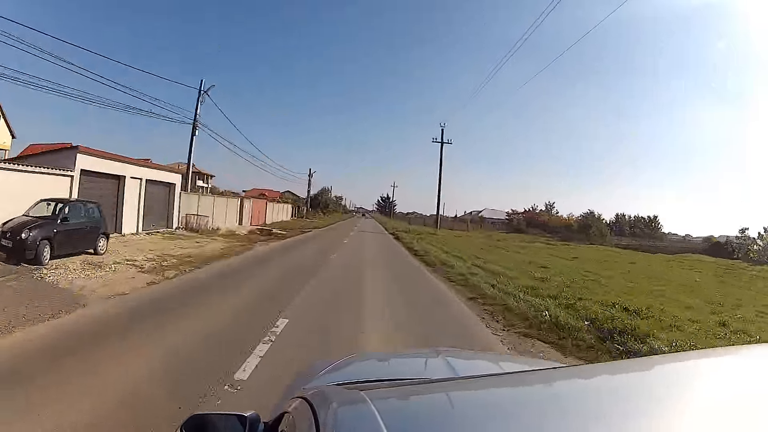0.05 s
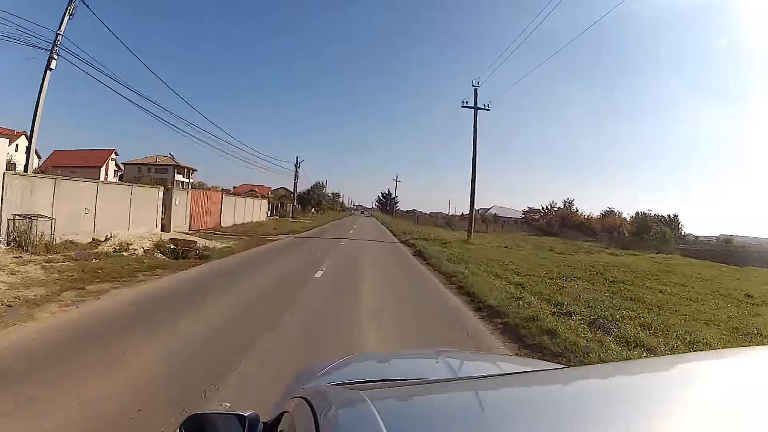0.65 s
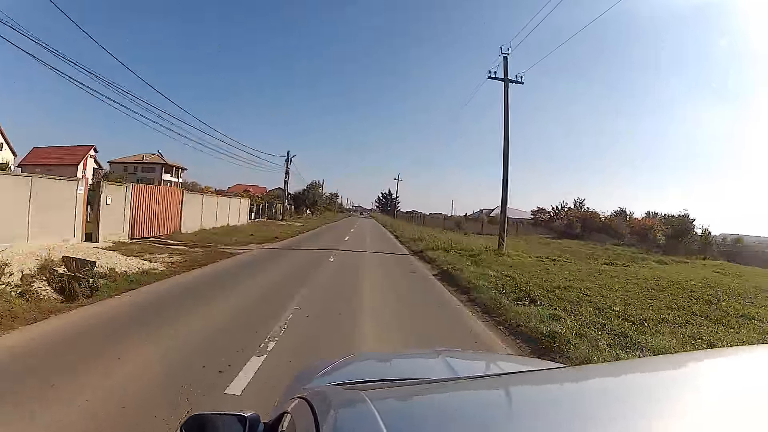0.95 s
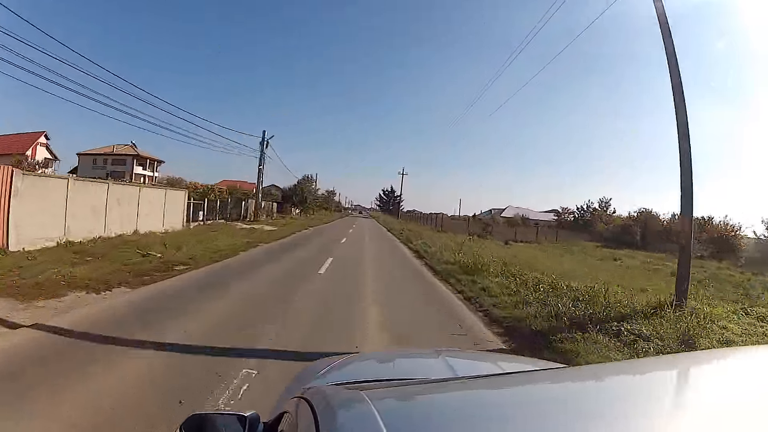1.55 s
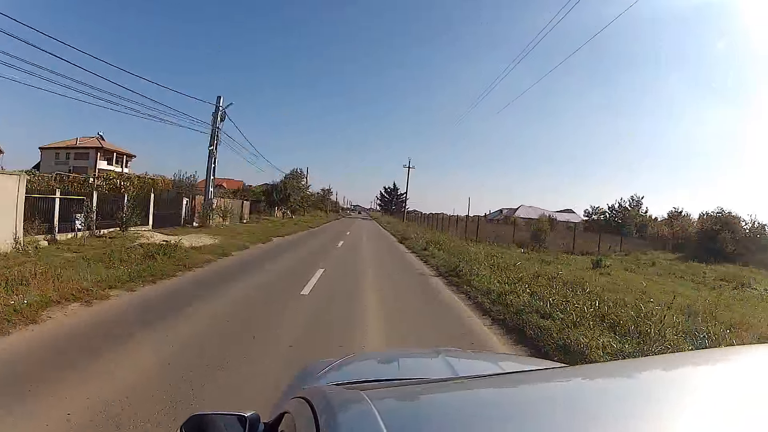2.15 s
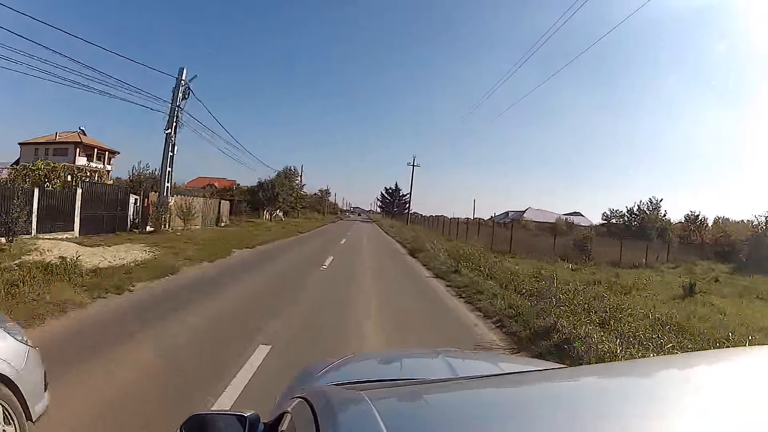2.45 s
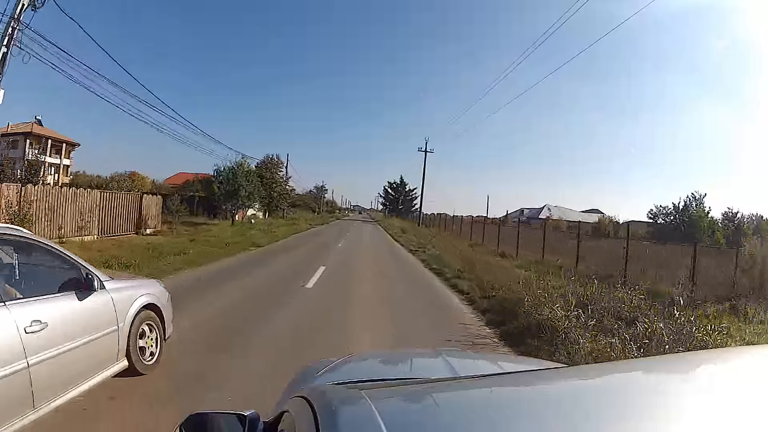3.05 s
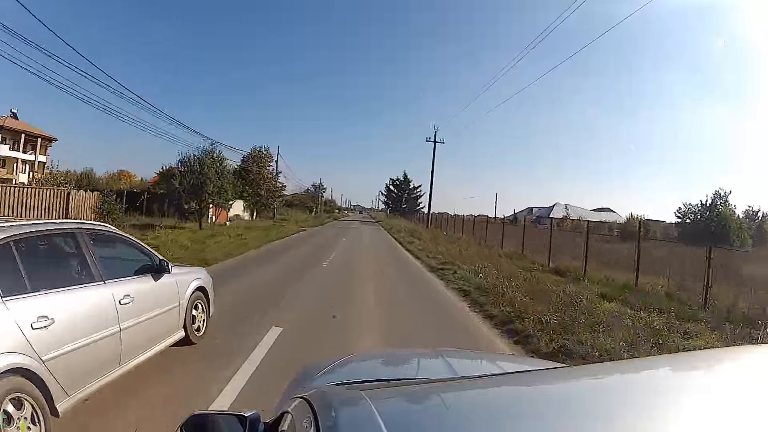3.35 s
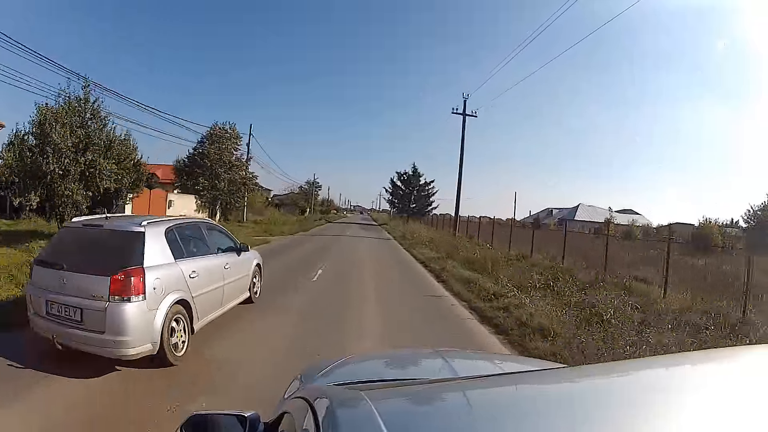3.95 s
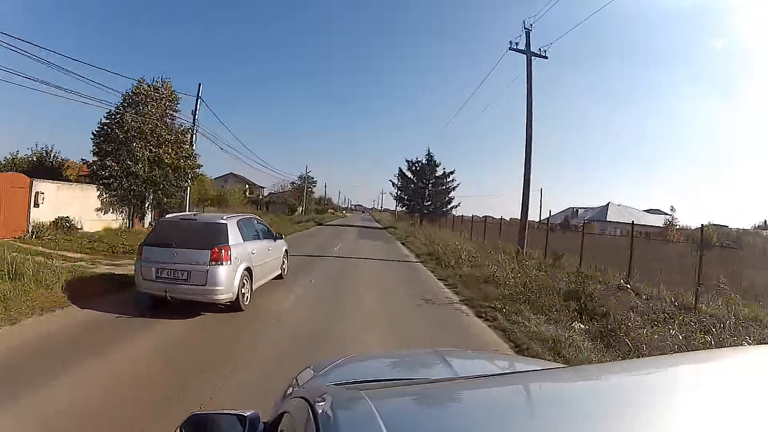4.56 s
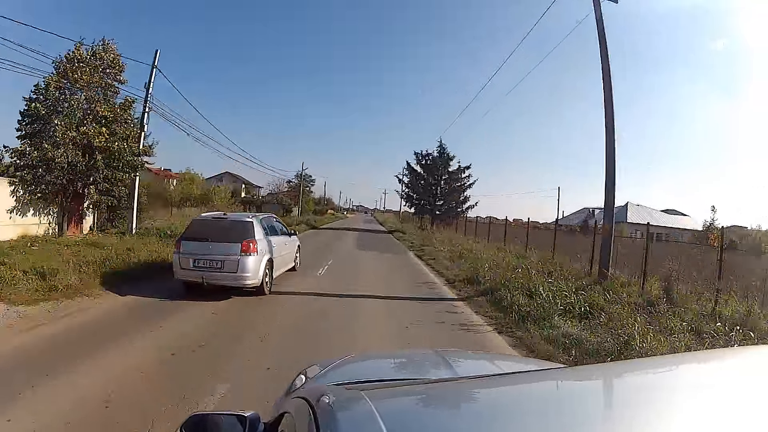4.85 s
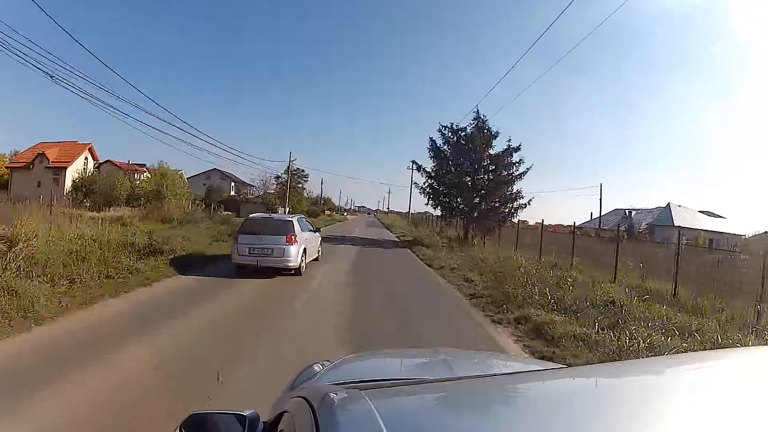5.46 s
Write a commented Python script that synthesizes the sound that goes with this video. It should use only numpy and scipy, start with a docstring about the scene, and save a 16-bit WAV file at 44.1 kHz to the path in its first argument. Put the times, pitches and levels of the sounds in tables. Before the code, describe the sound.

A car cruises along an asphalt road, heard from a microphone mounted on its outside. Deep wind rumble buffets the microphone throughout, with irregular soft thumps and fluttering. The diesel engine holds a steady low drone with light ticking, and the tyres roar evenly under a faint hiss of air. Midway, another car overtakes on the left, barely audible.

```python
"""Wind buffets over the steady drone of a four-cylinder diesel, heard from a camera on the outside of a
cruising car. Every firing knocks the block, injectors and valves tick, and the tyres roar on the asphalt.
Eddies flutter and thump against the camera while passing air hisses and rushes along the bodywork.
Midway, another car overtakes on the left, barely heard above it all."""
import sys
import numpy as np
from scipy import signal
from scipy.fft import rfft, irfft, next_fast_len
from scipy.io import wavfile
from scipy.ndimage import uniform_filter1d, map_coordinates

SR = 44100
rng = np.random.default_rng(int(sys.argv[2]) if len(sys.argv) > 2 else 0)


def persist_wave(psi):
    """Save psi, clipped to +-1, as 16-bit WAV."""
    counts = np.round(np.clip(psi, -1, 1) * 32767).astype(np.int16)
    wavfile.write(sys.argv[1], SR, np.atleast_2d(counts).T)


N = 251370

# engine speed: time_s, firing_rate_hz
FIRING_RATE = [(0.0, 64.64), (1.7, 64.71), (3.0, 64.55), (4.6, 64.69), (5.7, 64.61)]
# the four cylinders: injection_moment_cycles, strength_db
CYLINDERS = [(0.109, -1.5), (0.369, 4), (0.612, 2.5), (0.866, 2)]
# drone of block, intake and exhaust: multiple_of_cycle_rate, level_db, left_over_right_db
DRONE_ORDERS = [(2, -34.2, 1), (3, -40.6, -1), (4, -19.9, 4), (8, -46.3, 0), (11, -40.6, -1),
                (12, -41.9, -9), (13, -43.3, -1), (14, -47.2, 1), (15, -47.9, 0), (20, -45.3, 4),
                (21, -48.8, 2), (23, -48.6, -1), (25, -50.4, 1), (26, -43.2, 0), (27, -50.5, 1),
                (28, -50.7, 1), (30, -44.8, 3), (31, -50.1, 1), (32, -43.8, 0), (35, -46.9, 3),
                (36, -40.0, -1), (40, -44.9, -2), (41, -47.2, 1), (42, -46.7, 2), (43, -47.0, 1),
                (44, -45.0, -3), (45, -49.3, 1), (48, -49.4, 2), (52, -48.5, 3), (60, -47.6, 6),
                (61, -52.3, 4), (64, -48.2, 2), (66, -50.0, 4), (72, -49.7, 3), (76, -52.3, 4),
                (81, -58, 3), (83, -57, 3), (86, -53.6, 3), (88, -51.5, 1), (90, -58.5, 3), (98, -59, 4),
                (108, -54.5, 5), (136, -55.3, 3), (144, -60.5, 4), (156, -61.5, 4), (179, -61.5, 4),
                (182, -66, 4), (220, -66, 3), (224, -65, 3), (248, -70, 3)]
# faint whine of belt-driven parts: pitch_hz, level_db, left_over_right_db
BELT_TONES = [(804, -50, 1), (995, -52.5, 19)]
# narrow resonances that colour the engine's clatter: centre_hz, width_hz, lift_db
CLATTER_RESONANCES = [(1410, 42, 8), (1750, 56, 4.5), (2140, 67, 4.5), (2630, 79, 6.5), (2903, 80, 16.5),
                      (3635, 120, 12.5), (4300, 110, 2.5), (4980, 67, 14), (5260, 130, 14),
                      (6080, 76, 14.5), (6500, 110, 8), (6720, 140, 12), (8280, 190, 6.5)]

# tone colour of each layer: frequency_hz, gain_db
KNOCK_EQ = [(120, -36), (200, -31), (280, 4.5), (450, 0.5), (750, 7), (900, 4), (1100, -22), (1500, -14.5),
            (2200, -4), (3000, -11.5), (4500, -25.5)]
CLATTER_EQ = [(500, -26), (1000, 4), (1500, -0.5), (2200, -4), (2700, -10), (3200, -18), (4200, -9.5),
              (4600, -22.5), (7200, -24.5), (8300, -21), (12000, -25), (16000, -44)]
INJECTION_EQ = [(1500, -32), (3000, 8.5), (5000, -8), (7200, -4.5), (8300, 2.5), (10500, 0), (12100, 2),
                (13000, 2), (14500, -5), (16000, -20)]
TYRE_EQ = [(60, 7.5), (130, 1.5), (200, 1.5), (330, 0.7), (600, 0.5), (780, -0.5), (900, -4), (1050, 0.3),
           (1400, -7.5), (2000, -13.5), (3000, -27.5), (4500, -26.5), (8000, -39.5)]
BUFFET_EQ = [(4, -51), (10, 2), (18, -2.5), (33, 3), (52, 0.8), (66, -11), (85, -9), (105, -21), (150, -31),
             (300, -48), (800, -81)]
HISS_EQ = [(1500, -35), (3500, 4.5), (5200, 4), (6500, -1), (7200, -1.5), (8200, 1.5), (10500, 3),
           (12100, -4), (13000, -1), (14500, -8), (16000, -14)]
FLUTTER_EQ = [(45, -22), (65, 0.5), (78, 1.5), (98, -5.5), (120, -3.5), (165, -10), (230, -19.5),
              (320, -19.5), (500, -47.5)]
RUSH_EQ = [(700, -27), (1100, 1), (1400, 1.5), (1700, -1.5), (2100, -6.5), (3000, -14), (5000, -28)]
OVERTAKER_EQ = [(80, 0), (220, 0.5), (400, 2.5), (700, 0.5), (1100, -2), (1600, -8), (2500, -23),
                (5000, -40)]
# a comb of peaks and dips in the treble, from sound reflected off the bodywork: frequency_hz, gain_db
BODYWORK_RIPPLE_EQ = [(6000, 0), (6850, 0.7), (7250, -2.5), (7950, 1), (8300, -0.5), (9100, -1.6), (9750, -0.5),
                      (10650, -2), (11100, -0.7), (11700, -1), (12200, -3), (12900, -1.5), (13800, -1.5),
                      (14300, -5.5)]
# stereo width: frequency_hz, left_right_correlation
STEREO_LIKENESS = [(30, 0.94), (55, 0.99), (100, 0.65), (200, 1), (350, 0.32), (600, 1), (1000, 0.64),
                   (2000, 0.63), (3500, 0.45), (6000, 0.52), (8500, 0.45), (11000, -0.0076), (14000, -0.22)]
# stereo lean: frequency_hz, left_over_right_db
STEREO_BALANCE = [(30, -2.5), (100, -1), (200, 5), (300, 3), (600, 2), (1100, 5), (2500, 5), (4500, 2.5),
                  (14000, 2.5)]

# fader rides for asphalt coarseness, headwind, spells of flutter and rushing air: time_s, gain_db
COARSE_ASPHALT = [(0.0, 1.5), (0.27, 1.5), (0.75, 0.1), (1.03, 3), (1.35, 0.5), (1.9, 0.5), (2.08, -0.5),
                  (2.4, -0.5), (2.65, -3), (2.9, 0.5), (3.6, 1.2), (4.1, -0.5), (4.95, -1.5), (5.23, 2),
                  (5.5, -0.8), (5.7, 0)]
HEADWIND = [(0.0, 0.8), (0.25, 0), (0.6, -0.5), (0.8, -3.5), (1.05, -0.3), (1.65, -0.5), (2.0, -0.5),
            (2.25, -3.5), (2.6, -1), (3.0, 0), (3.6, -2.2), (4.05, 1), (4.6, -1), (5.05, -0.1), (5.7, -1.5)]
FLUTTER_SPELLS = [(0.0, -1), (0.3, 2.5), (0.58, 3), (0.85, 1), (1.1, -4.5), (1.5, -0.5), (2.02, 0),
                  (2.35, 2.5), (2.65, -1), (3.1, 1.5), (3.5, 1), (4.0, -6), (4.45, -0.5), (4.9, -4),
                  (5.2, -0.5), (5.7, 1.5)]
RUSH_SWELLS = [(0.0, -4), (0.35, 2), (0.8, -2), (1.2, 2), (1.6, -1), (2.05, -4), (2.35, 3), (2.7, -1),
               (3.1, -2), (3.45, -5), (3.8, -1), (4.25, -2), (4.7, 3), (5.2, -3), (5.7, -5)]
# big eddies that hit the camera: centre_s, relative_peak_db, pitch_hz
BIG_EDDIES = [(0.139, -5.5, 44), (0.23, -3.5, 28.8), (0.344, -8, 46), (0.477, -5, 40), (0.646, -6.5, 40),
              (1.033, -6, 35), (1.182, -9, 29), (1.915, -5, 35.6), (2.402, -8, 42), (2.813, -7, 48),
              (3.044, -8, 42), (3.369, -9.5, 26.9), (3.528, -4.5, 33), (3.944, -6.5, 34.6),
              (4.295, -12, 38), (4.47, -5, 45.3), (4.717, -5, 43), (4.918, -5, 38.5), (5.151, -6.5, 42.4),
              (5.233, -7.5, 36)]

TIME_S = np.arange(N) / SR


def amp(db):
    """Decibels to gain."""
    return 10 ** (np.asarray(db) / 20)


def unit(x):
    """x at rms 1."""
    return x / np.sqrt(np.mean(x ** 2) + 1e-20)


def curve(rows):
    """(time_s, value) rows as one value per sample."""
    return np.interp(TIME_S, *np.transpose(rows))


def along(points, hz):
    """(frequency_hz, value) points read on a log axis."""
    points_hz, values = np.transpose(points)
    return np.interp(np.log(hz + 1), np.log(points_hz + 1), values)


def wobble(rate_hz):
    """A smooth random curve through rate_hz knots a second."""
    return map_coordinates(rng.standard_normal(2048), [TIME_S * rate_hz], mode="mirror")


def noise():
    """Two unrelated white noises."""
    return rng.standard_normal((2, N))


def filtered(x, response):
    """x through an EQ given as a function of frequency."""
    size = next_fast_len(N + SR // 2)
    return irfft(rfft(x, size) * response(np.fft.rfftfreq(size, 1 / SR)), size)[..., :N]


def panned(left_db):
    """Left and right gains of mean power 1."""
    gains = amp([left_db / 2, -left_db / 2])
    return gains / np.sqrt(np.mean(gains ** 2, axis=0))


def coloured(pair, eq):
    """Two unrelated signals become one stereo sound of rms 1: near mono in the bass, wide on top."""
    def mid_side_gains(hz):
        width = np.arccos(np.clip(along(STEREO_LIKENESS, hz), -1, 1)) / 2
        return amp(along(eq, hz)) * [np.cos(width), np.sin(width)]

    mid, side = filtered(pair, mid_side_gains)
    stereo = np.array([mid + side, mid - side])
    return unit(filtered(stereo, lambda hz: panned(along(STEREO_BALANCE, hz))))


def every_cycle(pattern, cycle):
    """Loops a pattern once per engine cycle."""
    return map_coordinates(pattern, [cycle % 1 * len(pattern)], mode="grid-wrap")


def burst(since, rise, fall):
    """A rounded attack and a decay, once per cycle; all times are in cycles."""
    age = since % 1
    return (1 - np.exp(-age / rise)) ** 2 * np.exp(-age / fall)


def firings(cycle, rise, fall, scatter_db):
    """An envelope of one burst for each cylinder in turn, no two equally strong."""
    envelope = np.zeros(N)
    for moment, db in CYLINDERS:
        since = cycle - moment + 1
        scatter = rng.standard_normal(128)[since.astype(int)]
        envelope += amp(db + scatter_db * scatter) * burst(since, rise, fall)
    return unit(envelope)


def drone(cycle, waver_db, skew_rad, hum_hz=420, hum_width_hz=25, hum_rise_db_per_s=1.3):
    """Block, intake and exhaust hold clean orders: the firing rate booms, a mid hum slowly grows."""
    total = np.zeros((2, N))
    cycle_hz = cycle[-1] * SR / N
    rise_db = hum_rise_db_per_s * (TIME_S - N / SR / 2)
    for order, db, left_db in DRONE_ORDERS:
        # paths round the bodywork put the two sides a little out of step
        offset = skew_rad * rng.choice([-1, 1]) * np.array([[.5], [-.5]])
        tone = np.sqrt(2) * np.sin(2 * np.pi * (order * cycle + rng.random()) + offset)
        in_hum = np.exp(-((order * cycle_hz - hum_hz) / hum_width_hz) ** 2)
        total += panned(left_db)[:, None] * amp(db + in_hum * rise_db + waver_db * wobble(6)) * tone
    return total


def belt_whine(cycle, waver_db):
    """Belt-driven parts follow the shaft, but sing between its orders."""
    total = np.zeros((2, N))
    shaft_s = cycle / cycle[-1] * N / SR
    for hz, db, left_db in BELT_TONES:
        tone = np.sqrt(2) * np.sin(2 * np.pi * hz * shaft_s)
        total += panned(left_db)[:, None] * amp(db - waver_db * wobble(5.14)) * tone
    return total


def metal_ring(cycle, firing_lift_db, size=2730):
    """The metal rings alike in each cycle, on the many orders that the drone leaves free."""
    partials = np.exp(2j * np.pi * rng.random((2, size // 2 + 1)))
    # the cylinders ring much alike, which lifts the multiples of the firing rate
    partials[:, ::len(CYLINDERS)] *= amp(firing_lift_db)
    partials[:, [int(row[0]) for row in DRONE_ORDERS]] = 0
    return unit(np.array([every_cycle(ring, cycle) for ring in irfft(partials, size)]))


def knock(cycle):
    """Each combustion rings the block, which still sounds when the next one comes."""
    ring = metal_ring(cycle, firing_lift_db=5.0)
    return coloured(ring * firings(cycle, rise=0.018, fall=0.23, scatter_db=1.0), KNOCK_EQ)


def clatter(cycle, spread_cycles, fade_db, uneven_db, looseness, sustain, taps=6, size=2730):
    """Injectors and valves tap at set shaft angles after each firing; play in the parts varies the taps."""
    angle = np.arange(size) / size
    power = np.zeros(size)
    for moment, db in CYLINDERS:
        train = np.zeros(size)
        for tap, (slip, softness) in enumerate(rng.random((taps, 2))):
            delay = spread_cycles * (tap + slip / 2) / taps
            gain = amp(-fade_db * tap / taps - uneven_db * softness)
            train += (gain * burst(angle - moment - delay, rise=0.0066, fall=0.012)) ** 2
        # the taps differ less from cylinder to cylinder than the combustion does
        power += amp(db / 2) * train / train.mean()
    # sustain: the engine bay keeps ringing between the taps
    envelope = every_cycle(np.sqrt(power / power.mean() + sustain), cycle)
    ring = metal_ring(cycle, firing_lift_db=1.0) + looseness * noise()
    rattle = ring * envelope * amp(1.05 * wobble(130))
    return coloured(filtered(rattle, clatter_resonances), CLATTER_EQ)


def clatter_resonances(hz):
    """Narrow peaks colour the clatter: ringing engine metal lower down, the camera's case in the treble."""
    return 1 + sum((amp(db) - 1) / (1 + 2j * (hz - centre) / width)
                   for centre, width, db in CLATTER_RESONANCES)


def injection(cycle):
    """A short bright tick of fuel at each firing."""
    return coloured(noise() * firings(cycle, rise=0.036, fall=0.055, scatter_db=1.5), INJECTION_EQ)


def engine(drift_cycles):
    """All engine layers follow one shaft that drifts ahead and behind; four firings make a cycle."""
    cycle = np.cumsum(curve(FIRING_RATE)) / SR / len(CYLINDERS) + drift_cycles * wobble(5)
    return (amp(0.08) * drone(cycle, waver_db=0.66, skew_rad=0.5)
            + belt_whine(cycle, waver_db=2.5)
            + amp(-41.0) * knock(cycle)
            + amp(-43.5) * clatter(cycle, spread_cycles=0.218, fade_db=21.5, uneven_db=10.5,
                                   looseness=0.36, sustain=0.42)
            + amp(-51.0) * injection(cycle))


def tyres(patchy_db, low_share, tread_hz=794):
    """Tread roars on asphalt, its colour shifting with the surface; coarse stretches lift the top most."""
    spectrogram = signal.stft(noise(), nperseg=1024)[2]
    patches = rng.standard_normal(spectrogram.shape[1:])
    patches = uniform_filter1d(patches, size=7, axis=0)  # smooth across frequency
    patches = uniform_filter1d(patches, size=14, axis=1)  # and across time
    patchy_noise = signal.istft(spectrogram * amp(patchy_db * unit(patches)), nperseg=1024)[1][:, :N]
    roar = coloured(patchy_noise, TYRE_EQ)
    lows = filtered(roar, lambda hz: 1 / (1 + (hz / tread_hz) ** 10))
    coarse_db = curve(COARSE_ASPHALT)
    return lows * amp(low_share * coarse_db) + (roar - lows) * amp(coarse_db)


def buffet(lumpy_db, duck_share, duck_half_length_s):
    """Headwind eddies rumble on the camera; the rumble ducks while a big eddy displaces them."""
    rumble = unit(coloured(noise(), BUFFET_EQ) * amp(lumpy_db * wobble(22.05)))
    duck = sum(np.exp(-((TIME_S - centre_s) / duck_half_length_s) ** 2) for centre_s, _, _ in BIG_EDDIES)
    return amp(curve(HEADWIND)) * (1 - duck_share * duck) * rumble


def air_hiss(ease_db_per_s):
    """Passing air lays down a smooth, bright hiss that slowly eases."""
    return amp(-ease_db_per_s * TIME_S) * coloured(noise(), HISS_EQ)


def flutter(lumpy_db):
    """Small, quick eddies shed by the camera's own edges come in spells."""
    eddies = unit(coloured(noise(), FLUTTER_EQ) * amp(lumpy_db * wobble(45)))
    return amp(curve(FLUTTER_SPELLS)) * eddies


def rush():
    """Air tearing past the bodywork swells softly, louder on the left."""
    return amp(curve(RUSH_SWELLS)) * coloured(noise(), RUSH_EQ)


def thumps():
    """Each big eddy is one push of pressure with a suction before and after it."""
    total = np.zeros(N)
    for centre_s, db, hz in BIG_EDDIES:
        phase_squared = (np.pi * hz * (TIME_S - centre_s)) ** 2
        total += amp(db) * (1 - 2 * phase_squared) * np.exp(-phase_squared)
    return total


def overtaker(alongside_s, gap_m, faster_m_per_s, left_db):
    """The other car's dull tyre roar grows and fades as one over its distance."""
    ahead_m = faster_m_per_s * (TIME_S - alongside_s)
    nearness = gap_m / np.hypot(gap_m, ahead_m)
    return panned(left_db)[:, None] * coloured(noise(), OVERTAKER_EQ) * nearness


def scene():
    """Engine, tyres and wind form a constant bed while the other car slips past."""
    return (engine(drift_cycles=0.0004)
            + amp(-32.0) * tyres(patchy_db=1, low_share=0.25)
            + amp(-17.0) * buffet(lumpy_db=0.2, duck_share=0.47, duck_half_length_s=0.016)
            + amp(-50.0) * air_hiss(ease_db_per_s=0.64)
            + amp(-31.7) * flutter(lumpy_db=2.5)
            + amp(-47.5) * rush()
            + amp(0.7) * thumps()
            + amp(-37.0) * overtaker(alongside_s=2.67, gap_m=1.9, faster_m_per_s=5.3, left_db=2.0))


def record(dry):
    """Sound reflected off the bodywork ripples the treble, and the band limit cuts off the very top."""
    top_hz = 15750
    return filtered(dry, lambda hz: amp(along(BODYWORK_RIPPLE_EQ, hz)) * (hz < top_hz))


dry = scene()
out = record(dry)
persist_wave(out)
```